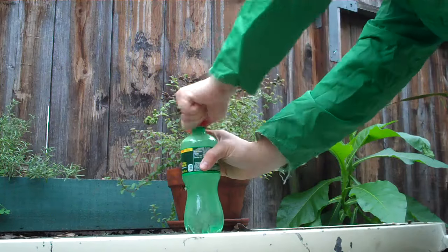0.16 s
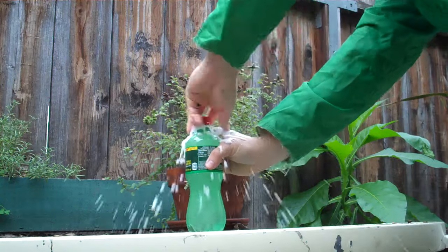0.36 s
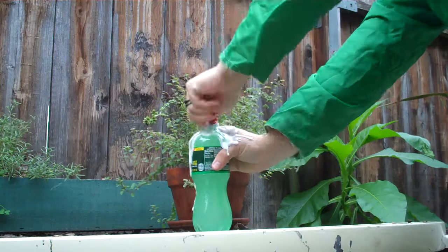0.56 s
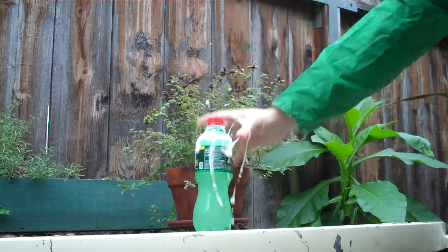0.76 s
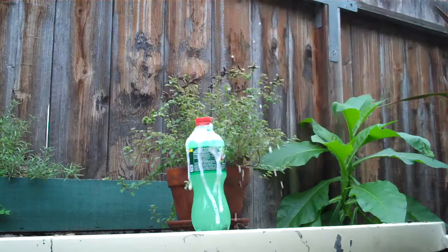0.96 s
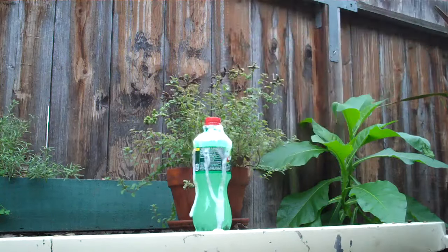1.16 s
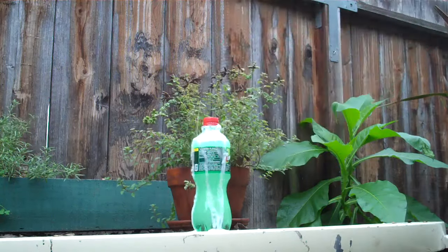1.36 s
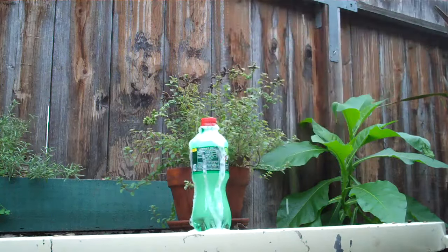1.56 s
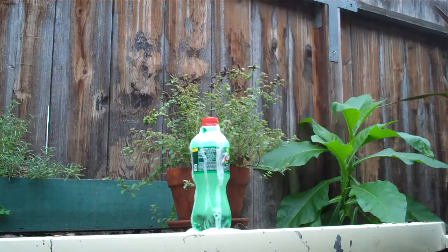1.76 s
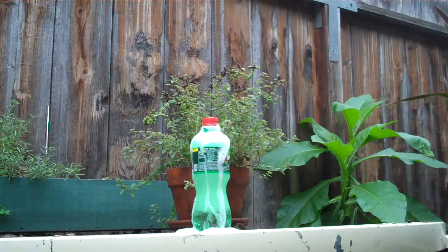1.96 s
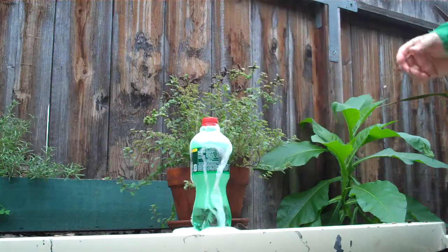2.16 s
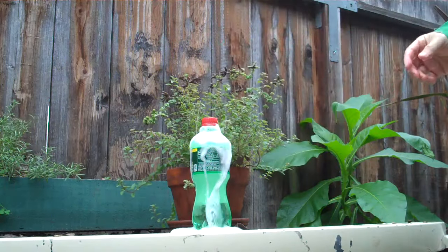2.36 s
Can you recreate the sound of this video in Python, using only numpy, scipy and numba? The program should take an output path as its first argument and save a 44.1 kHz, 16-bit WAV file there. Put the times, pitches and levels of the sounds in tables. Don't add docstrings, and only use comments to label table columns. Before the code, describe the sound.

Pressurised soda hisses sharply from a loosened plastic bottle cap, then foam fizzes amid small knocks

```python
import sys
import numpy as np
from scipy import signal
from scipy.fft import rfft, irfft
from scipy.io import wavfile
from scipy.ndimage import uniform_filter1d
from numba import njit

SR = 44100
rng = np.random.default_rng(int(sys.argv[2]) if len(sys.argv) > 2 else 0)


def unload_audio(sound):
    columns = np.transpose(np.atleast_2d(sound))
    steps = np.round(np.clip(columns, -1, 1) * 32767)
    wavfile.write(sys.argv[1], SR, steps.astype(np.int16))


def natural_amplitude(level_db):
    exponent = np.asarray(level_db, float) / 20
    return 10 ** exponent


N = 110250
T = np.arange(N) / SR


def logf(table, hz):
    a = np.array(table, float)
    return np.interp(np.log(np.maximum(hz, 1)), np.log(a[:, 0]), a[:, 1])


def unit(x):
    return x / np.sqrt(np.mean(x ** 2))


def colour(x, table):
    hz = np.arange(N // 2 + 1) * SR / N
    return unit(irfft(rfft(x) * natural_amplitude(logf(table, hz)), N))


@njit
def svf(x, hz, width):
    y, b, l = np.empty(len(x)), 0., 0.
    for i in range(len(x)):
        g = np.tan(np.pi * hz[i] / SR)
        k = width[i] / hz[i]
        v = (b + g * (x[i] - l)) / (1 + g * (g + k))
        b = 2 * v - b
        l = l + 2 * g * v
        y[i] = k * v
    return y


def band(x, hz, width):
    return signal.lfilter(*signal.iirpeak(hz, hz / width, fs=SR), x)


def above(x, hz):
    return signal.sosfilt(signal.butter(4, hz, "high", fs=SR, output="sos"), x)


def walk(rate):
    k = max(int(SR / rate), 1)
    stairs = rng.standard_normal(N)[np.arange(N) // k]
    return unit(uniform_filter1d(uniform_filter1d(stairs, k), k))


def grit(share, spread_db):
    clicks = rng.standard_normal(N) * (rng.random(N) < share)
    return clicks * natural_amplitude(spread_db * np.minimum(rng.exponential(size=N), 4))


def swell(t, rise, t60):
    rising_db = -20 * (t - T) / max(rise, 1e-3)
    falling_db = -60 * (T - t) / max(t60, 5e-3)
    return natural_amplitude(np.where(T < t, rising_db, falling_db))


def curve(table, start_db=-90):
    a = np.array(table, float)
    return natural_amplitude(np.interp(T, a[:, 0], a[:, 1], left=start_db))


def town():
    # frequency in Hz, level in dB per Hz.
    town_colour = [(20, -7), (40, 5), (120, -13), (300, -7.5), (700, -10.5), (1500, -9.5), (9000, -22),
                   (14000, -31)]
    # frequency in Hz, width in Hz, level in dB.
    engine_tones = [(69.5, 11.4, -0.5), (143, 24, -5)]
    # time in seconds, level in dB.
    hum_course = [
        (0.0, -69),
        (0.02, -62),
        (0.25, -58),
        (0.28, -67),
        (0.72, -65),
        (0.75, -55),
        (0.91, -62),
        (0.94, -57.5),
        (2.5, -55.5),
    ]
    air = natural_amplitude(-55 + 1.0 * walk(0.85)) * colour(rng.standard_normal(N), town_colour)
    hum = 0
    for hz, width, db in engine_tones:
        hum = hum + natural_amplitude(db + .5 * walk(2.7)) * unit(band(rng.standard_normal(N), hz, width))
    return air + curve(hum_course) * hum


def snaps():
    # start in seconds, peak in dB, pitch in Hz, t60 in seconds.
    clean_snaps = [(.0022, -40.5, 3200, 0.0044), (0.0799, -35, 2160, .006), (0.0806, -36.5, 3950, 0.012),
                   (.084, -48, 4030, 0.017), (0.091, -42, 3900, .015), (.5297, -22, 2180, 0.0065),
                   (.5297, -21, 5000, .006), (.5297, -20.5, 750, 0.017), (0.5285, -17, 1330, 0.003),
                   (.5297, -26, 3300, .005), (.5297, -34, 6360, .005), (.5345, -22, 3900, 0.0062),
                   (0.536, -21, 880, 0.012), (.54, -32.5, 930, 0.063), (.5785, -30, 5940, .008),
                   (.674, -33, 185, 0.14), (0.6825, -20, 8900, 0.0078), (0.6802, -19, 2300, .01),
                   (.687, -23, 1700, 0.033), (.7165, -19, 2300, 0.013), (0.691, -28, 243, 0.13),
                   (0.707, -24, 447, 0.085), (0.716, -23.5, 305, 0.035), (.737, -25.5, 234, 0.055),
                   (0.75, -24.5, 254, 0.05), (.759, -26, 274, 0.042), (0.774, -45, 232, 0.11),
                   (0.801, -38, 265, 0.095), (.942, -32.5, 329, 0.044), (.96, -35.5, 228, 0.17),
                   (1.397, -20, 3170, .008), (1.4166, -15.5, 3100, .007), (1.418, -28, 4700, .006),
                   (1.442, -21, 2700, 0.0099), (2.153, -30, 2770, 0.0096), (2.1722, -20.5, 4000, .006),
                   (2.1722, -21, 6000, .005), (2.1722, -19.5, 8600, .007), (2.1722, -27, 10300, .005),
                   (2.1722, -29, 12300, .004), (2.1722, -29, 14700, .004), (2.1748, -24, 7700, .012),
                   (2.203, -23.5, 8950, .008), (2.188, -28.5, 1630, 0.026), (1.4225, -29, 2660, .01),
                   (1.425, -31, 5140, .008)]
    # start in seconds, peak in dB, pitch in Hz, t60 in seconds.
    hard_cracks = [
        (.5297, -11, 2400, .0018),
        (2.1722, -17, 7000, .001),
        (.6815, -17, 3500, .0015),
    ]
    out = 0
    for t, db, hz, t60 in [*clean_snaps, *hard_cracks]:
        u = np.maximum(T - t, 0)
        out = out + above(natural_amplitude(db - 60 * u / t60) * np.sin(2 * np.pi * hz * u), hz / 4)
    return out


def spurts():
    # peak in seconds, rise in seconds, fall t60 in seconds, level in dB, centre in Hz.
    seal_puffs = [
        (.048, 0.0036, 0.085, -55, 5100),
        (.081, .001, 0.045, -50, 2980),
        (0.212, .004, 0.017, -10.5, 3920),
        (0.22, 0.005, 0.14, -7.5, 4360),
        (0.227, 0.012, 0.05, -7.5, 3190),
        (0.2505, 0.0025, 0.038, -7.5, 3970),
        (.29, 0.054, 0.34, -18, 6500),
        (.4, 0.11, 0.26, -34, 1900),
        (.228, .01, 0.13, -47, 90),
    ]
    # peak in seconds, rise in seconds, fall t60 in seconds, level in dB, centre in Hz.
    foam_spurts = [(.54, 0.033, 0.16, -32, 3460), (.575, 0.0083, 0.078, -48, 3970),
                   (.682, 0.0011, 0.023, -38, 5930), (.704, 0.0027, 0.019, -33, 4850),
                   (0.715, 0.025, 0.15, -27.5, 6230), (0.734, 0.0039, 0.032, -43, 5000),
                   (0.699, 0.055, 0.1, -27.5, 2360), (0.757, 0.06, 0.019, -28, 1570),
                   (0.884, 0.013, 0.081, -41, 4930), (.925, 0.024, 0.13, -39.5, 4500),
                   (1.169, 0.044, 0.41, -26, 5480), (1.233, 0.13, 0.24, -30.5, 3550),
                   (1.3, .02, 0.11, -52, 4000), (1.377, 0.011, 0.079, -30, 3900),
                   (1.403, 0.0047, 0.12, -28, 3860), (1.424, 0.035, 0.077, -30, 3630),
                   (1.691, 0.013, 0.041, -45, 2330), (1.12, 0.045, 0.23, -48, 2070),
                   (.98, 0.033, 0.55, -47.5, 8400), (2.172, 0.0029, 0.22, -32, 7100),
                   (2.191, 0.039, 0.1, -33, 4340)]
    air = (rng.standard_normal(N) + 0.23 * unit(grit(0.033, 2.6))) * natural_amplitude(walk(200))
    out = 0
    for rows, breadth in ((seal_puffs, 0.81), (foam_spurts, 1.0)):
        for t, rise, t60, db, hz in rows:
            broad = band(air, hz, 2.43 * breadth * hz)
            burst = above(band(broad, hz, 0.67 * breadth * hz), 0.34 * hz)
            out = out + natural_amplitude(db) * unit(burst) * swell(t, rise, t60)
    return out


def jet():
    # time in seconds, level in dB, whistle centre in Hz.
    jet_course = [
        (.194, -43, 4060),
        (.197, -43, 4330),
        (.218, -34, 3700),
        (.236, -14, 3600),
        (.252, -14, 4250),
        (.272, -13, 6000),
        (.36, -28, 4500),
        (.47, -33, 3370),
        (.6, -65, 3300),
    ]
    # frequency in Hz, level in dB per Hz.
    jet_colour = [(150, -23), (1000, -5), (2200, 6.5), (4000, 10), (6000, -4), (8800, 6.5), (10500, -11),
                  (14000, -15)]
    course = np.array(jet_course)
    hz = np.interp(T, course[:, 0], course[:, 2]) * (1 + 0.05 * walk(43))
    gas = colour(rng.standard_normal(N), jet_colour) * natural_amplitude(0.5 * walk(249))
    whistle = unit(svf(rng.standard_normal(N), hz, .4 * hz)) * natural_amplitude(walk(120))
    spray = colour(grit(0.053, 1.1), jet_colour)
    mix = unit(gas + natural_amplitude(9) * whistle + natural_amplitude(2) * spray)
    return mix * curve(jet_course) * (T < course[-1, 0] + .05)


def rail():
    # peak in seconds, rise in seconds, fall t60 in seconds, level in dB.
    base_rubs = [
        (0.225, 0.017, 0.079, -30.5),
        (0.269, 0.0098, 0.068, -33.5),
        (0.682, 0.0095, 0.14, -37),
        (0.695, 0.022, 0.17, -35),
        (0.727, 0.059, 0.11, -30),
        (0.761, 0.047, 0.3, -32.5),
        (0.944, 0.0074, 0.15, -41.5),
        (1.06, 0.12, 0.64, -41),
        (1.171, 0.026, 0.4, -39),
    ]
    # frequency in Hz, width in Hz, level in dB.
    rail_modes = [(185, 14, -9), (244.7, 6, -9), (321, 89, 2), (444, 53, -6), (645, 320, -1),
                  (1150, 290, -1), (1900, 1500, -11)]
    rub = unit(rng.standard_normal(N) * natural_amplitude(walk(149.8)))
    rub = rub * sum(natural_amplitude(db) * swell(t, rise, t60) for t, rise, t60, db in base_rubs)
    ring = 0
    for hz, width, db in rail_modes:
        ring = ring + natural_amplitude(db - 7.5) * np.sqrt(SR / width / np.pi) * band(rub, hz, width)

    u = T - 1.633
    phase = 2 * np.pi * 500 * (u + 1.0 * u ** 2)
    tone = np.sin(phase) + natural_amplitude(-2) * np.sin(2 * phase)
    glug = natural_amplitude(-42) * np.exp(-(u / .015) ** 2) * tone
    return above(ring, 132) + glug


def foam():
    # time in seconds, level in dB.
    foam_flow = [(.6, -42.5), (.66, -49), (.84, -41), (.93, -43.5), (1.0, -40), (1.1, -39), (1.33, -34.5),
                 (1.47, -36), (1.55, -38.5), (1.66, -36), (1.74, -36), (1.85, -38.5), (1.95, -38.5),
                 (2.05, -40), (2.14, -37.5), (2.25, -41.5), (2.5, -42.5)]
    # frequency in Hz, level in dB per Hz.
    foam_colour = [(200, -10), (500, -11), (1000, -9.5), (2300, -4.5), (5000, -10.5), (9000, -16.5),
                   (10500, -29), (14000, -26)]
    pops = 0
    for hz in 900 * 2 ** np.arange(0, 3.6, .25):
        ringing = unit(band(grit(0.034, 4.7), hz, hz / 5)) * np.sqrt(hz)
        pops = pops + ringing * natural_amplitude(logf(foam_colour, hz) + 3.0 * np.minimum(walk(12.5), 1.3))
    fizz = colour(rng.standard_normal(N), foam_colour)
    mix = unit(fizz + natural_amplitude(-2) * unit(pops)) * natural_amplitude(.5 * walk(8.45))
    fade_in = np.clip((T - .45) / 0.067, 0, 1)
    return mix * curve(foam_flow, foam_flow[0][1]) * fade_in


def ticks():
    # start in seconds, peak in dB, pitch in Hz, t60 in seconds.
    contacts = [(1.3735, -27, 3300, 0.006), (.682, -12, 1900, 0.011), (0.682, -17, 4440, 0.0098),
                (.704, -18, 1250, 0.0077), (0.718, -20, 2230, 0.007), (0.736, -17, 2500, .01),
                (0.754, -24.5, 1180, 0.032), (0.941, -32.5, 212, 0.11), (0.951, -30.5, 393, 0.05),
                (1.066, -36, 1290, 0.014), (1.398, -20, 780, 0.008), (1.654, -23, 3980, .004),
                (1.693, -23.5, 1500, 0.017), (1.4045, -27, 3970, 0.008)]
    out = 0
    for t, db, hz, t60 in contacts:
        u = np.maximum(T - t, 0)
        envelope = natural_amplitude(db - 8 - 60 * u / t60) * (1 - np.exp(-2 * u * hz))
        spread = 0.15 + 0.237 * min(hz / 3000, 1)
        for step, chance in zip(np.linspace(-1, 1, num=5), rng.standard_normal(5)):
            partial_hz = min(hz * np.exp(spread * (step + 0.19 * chance)), 15000)
            out = out + envelope * np.sin(2 * np.pi * partial_hz * u)
    return above(out, 220)


def scene():
    # frequency in Hz, level in dB.
    mic_response = [(20, 5), (9000, 4.5), (10500, 1.5), (14500, -5)]
    # frequency in Hz, left minus right in dB.
    port_balance = [(60, 3), (500, 2), (1000, 2), (4000, 2.5), (7000, -1), (9000, -19), (11500, 22),
                    (14000, 20)]
    # frequency in Hz, level in dB relative to the sum.
    lagging_part = [(60, -30), (500, -22), (2000, -20), (5000, -14), (8500, -6), (13000, -5)]
    # frequency in Hz, level in dB relative to the sum.
    scattered_part = [(60, -18), (200, -22), (600, -14), (1200, -11), (2500, -9.5), (5000, -5),
                      (8500, -2.5), (13000, -1.5)]
    mid = rfft(town() + snaps() + spurts() + jet() + rail() + foam() + ticks())
    hz = np.arange(len(mid)) * SR / N
    mid = mid * natural_amplitude(logf(mic_response, hz))

    delay = .015 * np.abs(1 + 1.0 * walk(40.0)[:len(mid)])
    scatter = np.exp(-2j * np.pi * np.cumsum(delay) * SR / N)
    g = natural_amplitude(logf(port_balance, hz))
    balance = (g - 1) / (g + 1)
    lag = -1j * natural_amplitude(logf(lagging_part, hz))
    side = mid * (balance + lag + natural_amplitude(logf(scattered_part, hz)) * scatter)
    return irfft(np.array([mid + side, mid - side]), N, axis=1)


def band_limit(x):
    return signal.sosfilt(signal.butter(12, 14970, fs=SR, output="sos"), x)


def record(dry):
    duck_db, release_s, knee_db = -8, .1, -36
    keep = np.exp(-1 / (release_s * SR))
    power = np.mean(dry ** 2, axis=0)
    loud = signal.lfilter([1 - keep], [1, -keep], power) / natural_amplitude(2 * knee_db)
    x = dry * natural_amplitude(duck_db * loud / (1 + loud))
    x = x / (1 + np.abs(x / .8) ** 6) ** (1 / 6)
    top_cut = signal.cheby2(10, 40, 14900, fs=SR, output="sos")
    return band_limit(signal.sosfilt(top_cut, x))


dry = scene()
out = record(dry)
unload_audio(out)
```